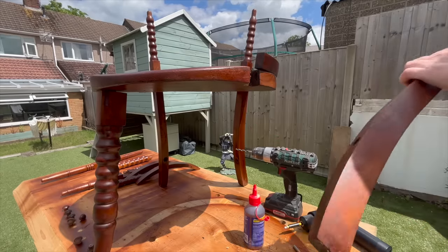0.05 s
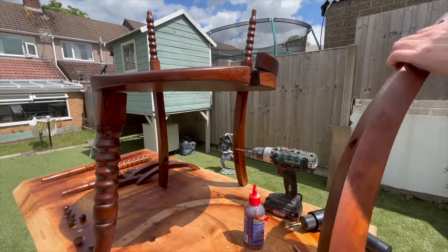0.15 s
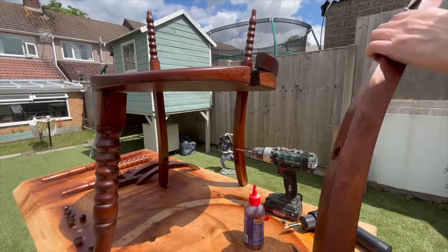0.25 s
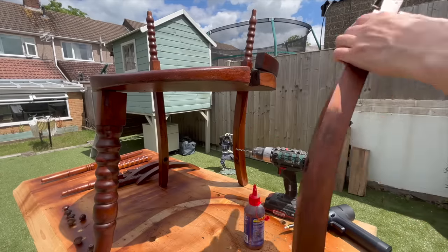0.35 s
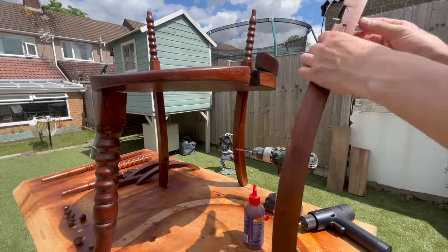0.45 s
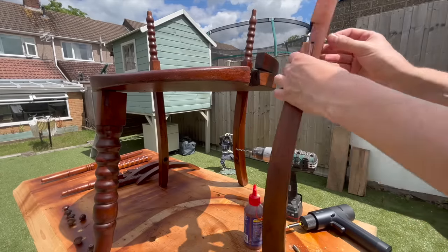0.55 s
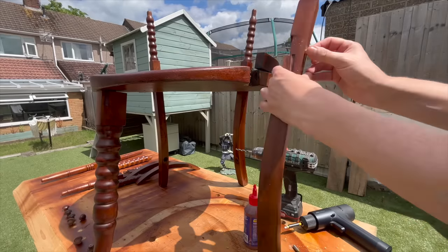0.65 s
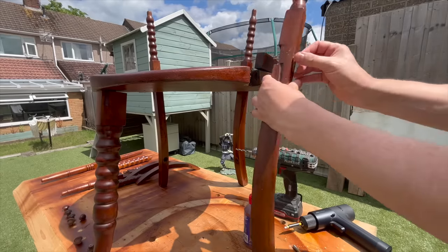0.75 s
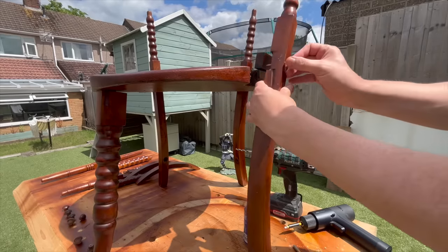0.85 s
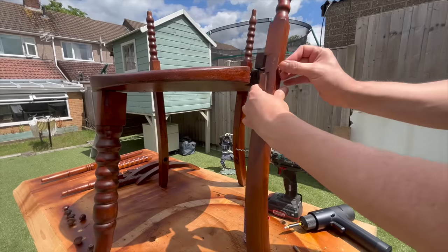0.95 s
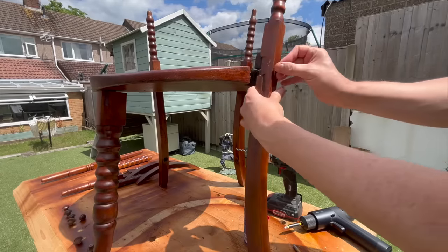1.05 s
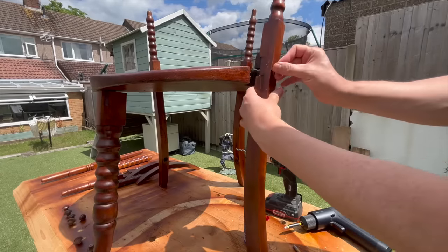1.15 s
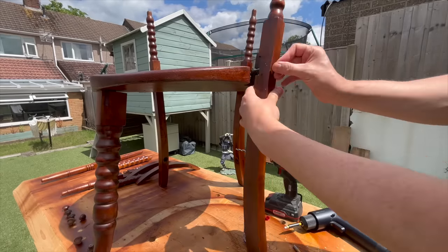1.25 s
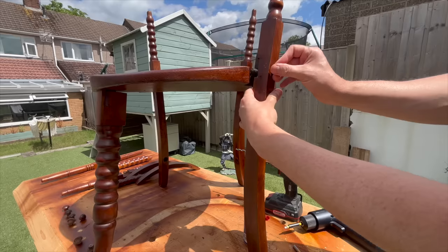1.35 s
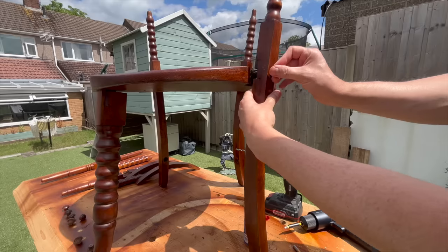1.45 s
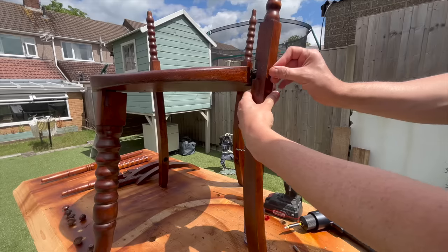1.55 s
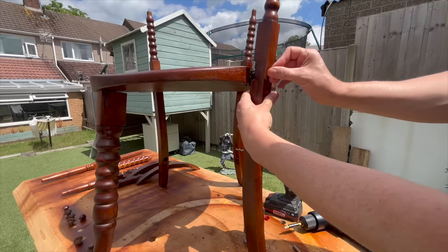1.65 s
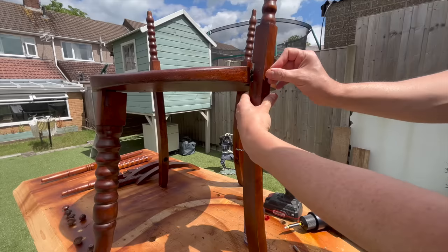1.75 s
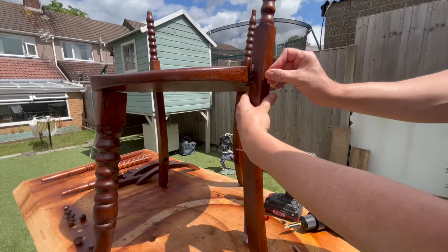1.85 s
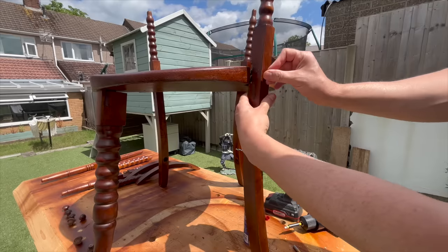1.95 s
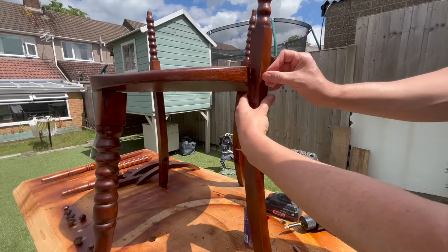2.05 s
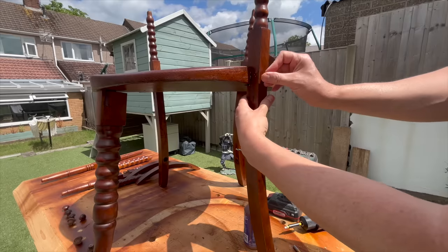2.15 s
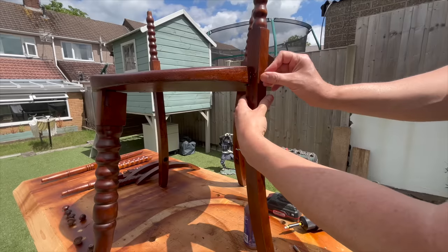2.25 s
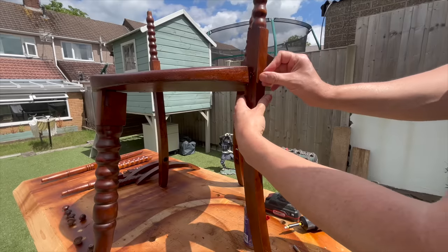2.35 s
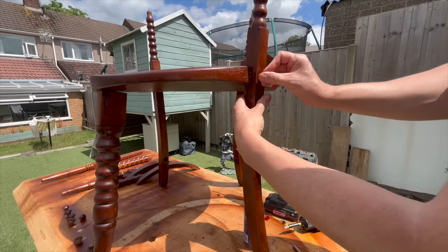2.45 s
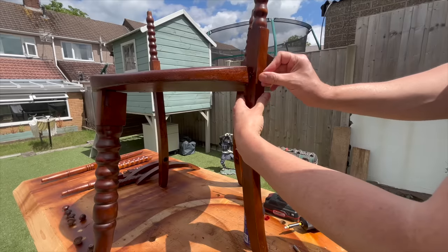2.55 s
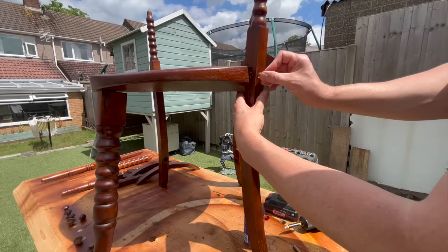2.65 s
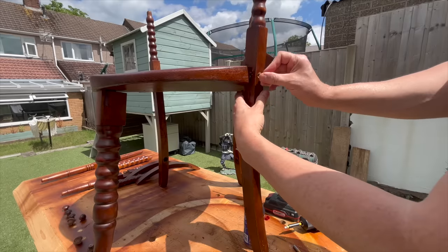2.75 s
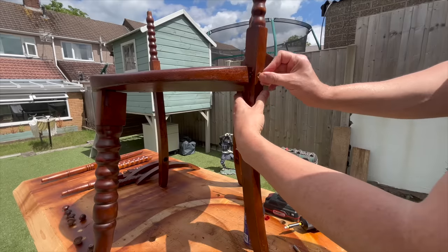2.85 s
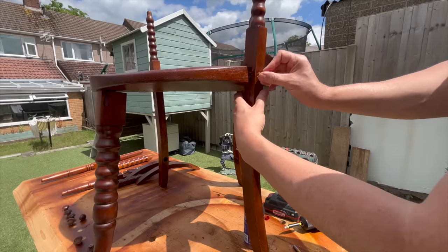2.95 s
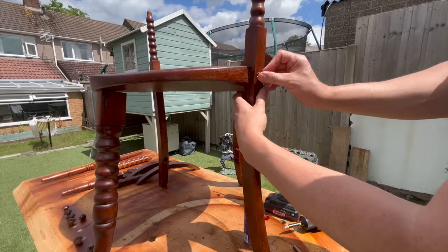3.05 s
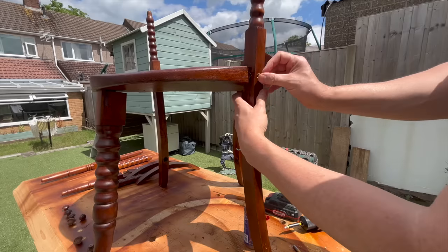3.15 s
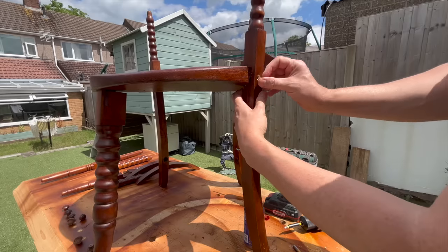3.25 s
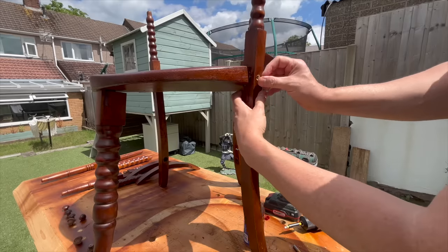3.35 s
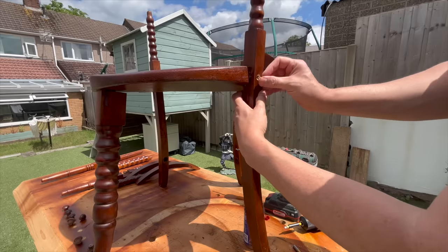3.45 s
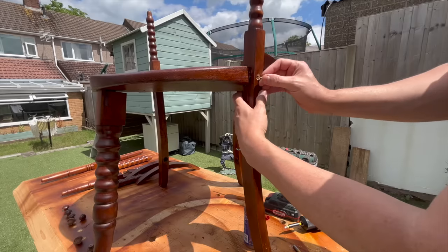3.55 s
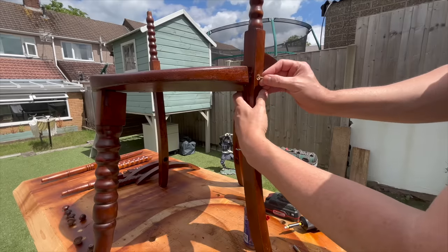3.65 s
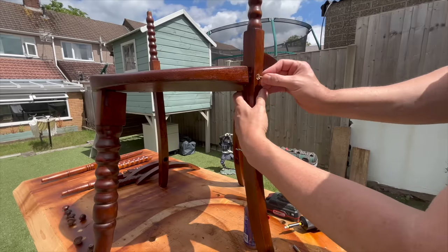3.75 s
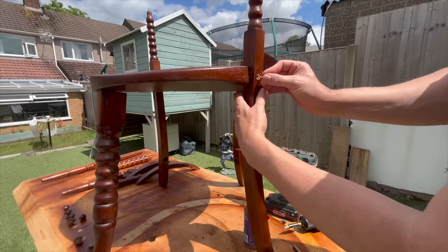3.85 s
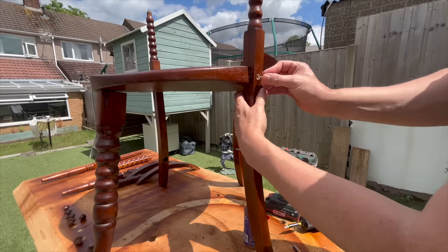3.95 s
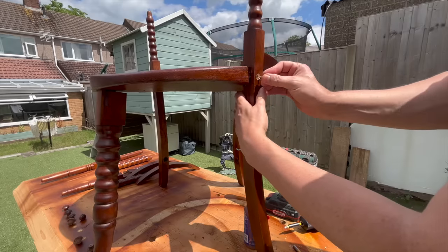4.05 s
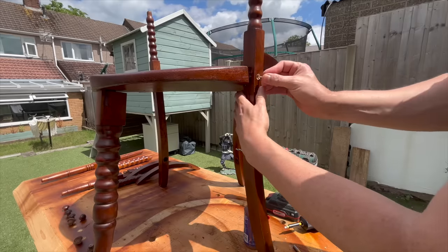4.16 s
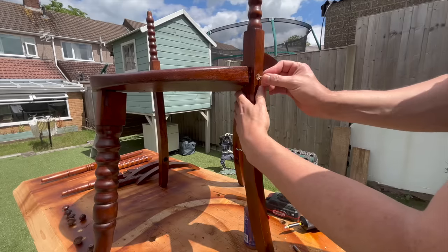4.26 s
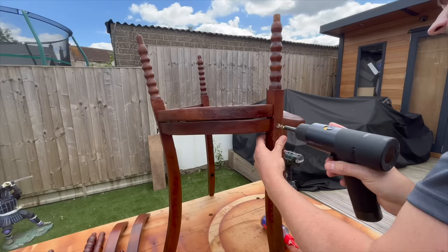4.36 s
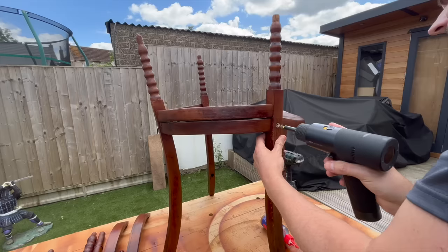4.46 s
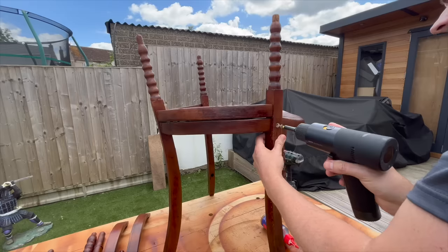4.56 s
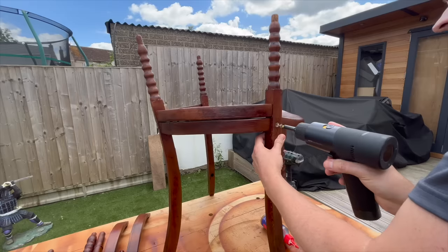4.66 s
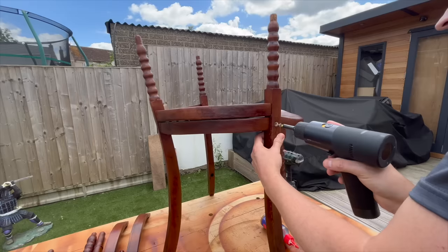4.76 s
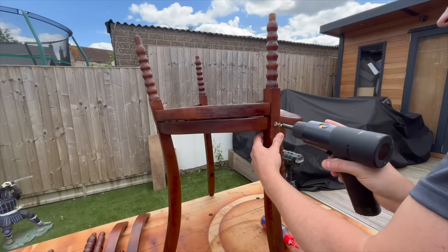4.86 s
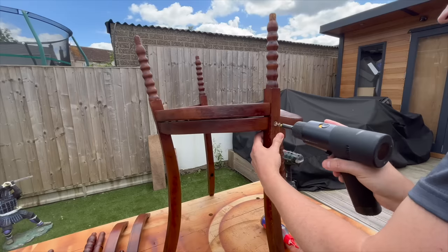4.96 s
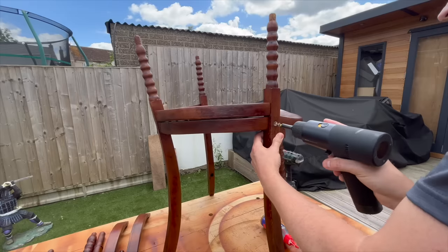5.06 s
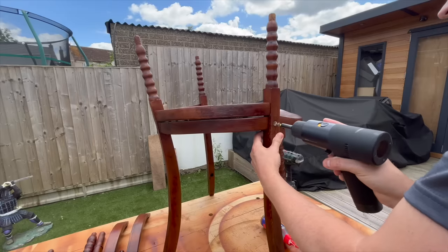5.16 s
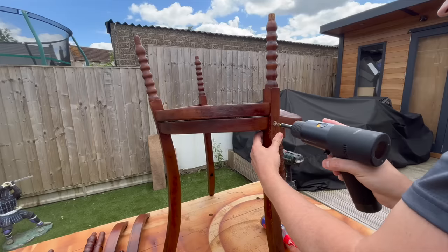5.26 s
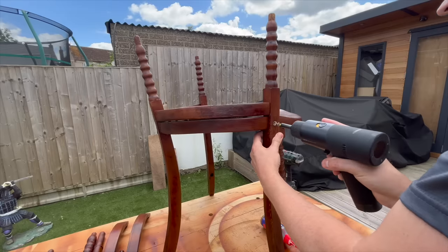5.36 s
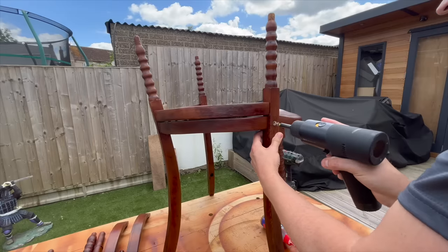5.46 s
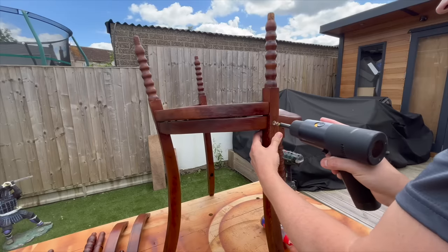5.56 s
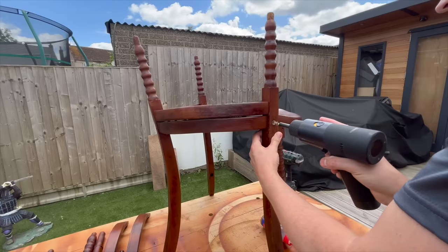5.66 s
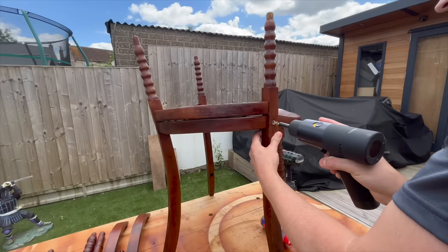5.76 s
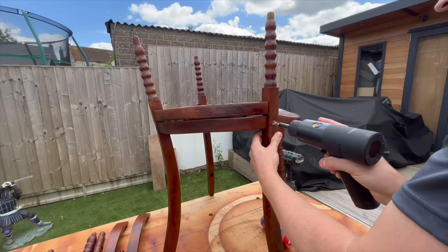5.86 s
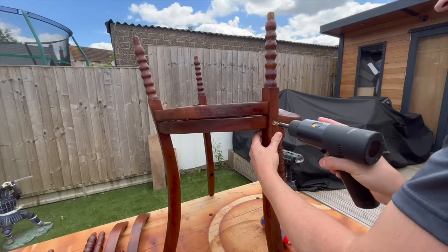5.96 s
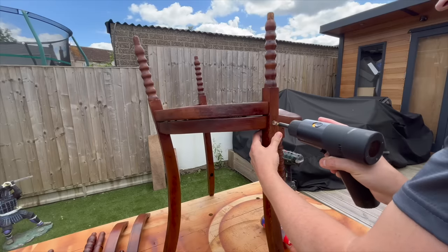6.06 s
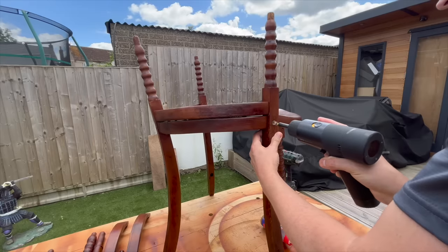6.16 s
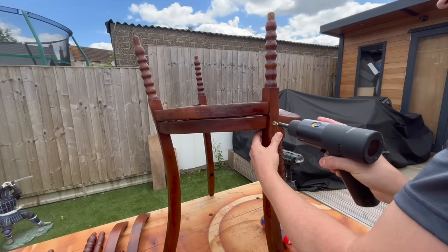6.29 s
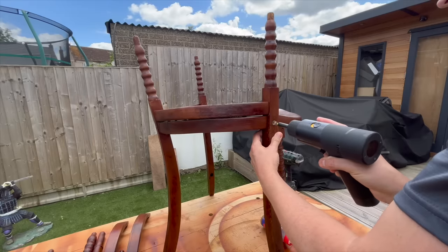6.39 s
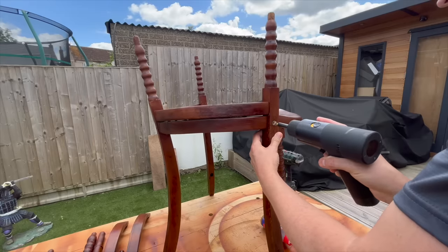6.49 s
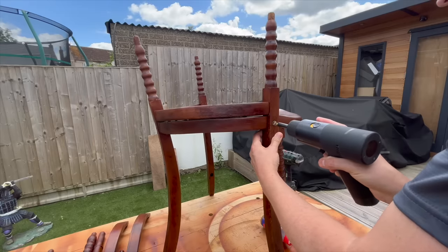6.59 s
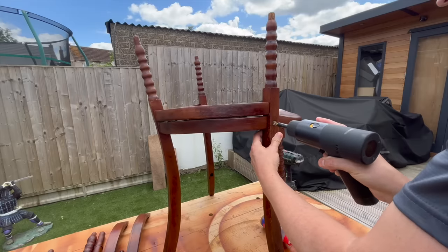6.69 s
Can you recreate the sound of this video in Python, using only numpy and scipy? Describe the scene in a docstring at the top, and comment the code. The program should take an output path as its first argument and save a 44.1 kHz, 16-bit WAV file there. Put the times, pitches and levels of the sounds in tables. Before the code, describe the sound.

In a quiet garden, small metal parts tick and a wooden chair leg is fitted with a few light, dull knocks. Very faint birds trill high up over a soft hush of distant traffic and leaves. After a lull, a trigger clicks and a small cordless screwdriver starts close by. Its raspy motor whine is the loudest sound, climbing steadily in pitch and growing stronger to the end.

```python
"""A small cordless screwdriver starts and speeds up: its motor and gears whine at multiples of the
turn rate over a rasp of tooth contacts, coloured by the resonances of its plastic housing and a chair.
Before it starts, the wooden chair leg is fitted with a few light knocks and small metal parts tick,
each ringing in its damped modes. Around them is a garden: small birds trill nearby and far off
in frequency-modulated whistles, over distant traffic, leaves and wind."""
import sys
import numpy as np
from scipy import signal
from scipy.fft import rfft, irfft
from scipy.io import wavfile
from scipy.ndimage import uniform_filter1d

SR = 44100
rng = np.random.default_rng(int(sys.argv[2]) if len(sys.argv) > 2 else 0)


def generate_wav(sig):
    """Save sig (samples, or channels by samples) to the path in sys.argv[1] as 16-bit PCM at SR."""
    pcm = np.round(np.clip(np.atleast_2d(sig).T, -1, 1) * 32767).astype(np.int16)
    wavfile.write(sys.argv[1], SR, pcm)


N = 296616
T = np.arange(N) / SR
HZ = np.maximum(np.arange(N // 2 + 1) * SR / N, 1)


def amp(db):
    """Decibels to amplitude ratio."""
    return 10 ** (np.asarray(db) / 20)


def rms_one(x):
    """Normalisation to unit rms."""
    return x / np.sqrt(np.mean(x ** 2) + 1e-20)


def columns(rows, at, log=False):
    """Interpolation of a table along its first column, on a linear or logarithmic axis."""
    key, *rest = np.transpose(rows)
    return [np.interp(np.log(at), np.log(key), c) if log else np.interp(at, key, c) for c in rest]


def drift(rate):
    """Slow random modulation: straight lines between `rate` Gaussian values per second."""
    knots = rng.standard_normal(int(N / SR * 60) + 2)
    return np.interp(T * rate, np.arange(len(knots)), knots)


def pan(x, db):
    """Stereo placement by level difference, left minus right."""
    return x * amp([[db / 2], [-db / 2]])


def add(out, at_s, piece):
    """Superposition of a stereo piece from a given time."""
    i = round(at_s * SR)
    out[:, i:i + piece.shape[1]] += piece[:, :N - i]


# Hiss of traffic and leaves. Each row: time in seconds, level in dB.
AIR_LEVEL = [(0.0, -70.5), (0.15, -71), (0.45, -73), (4.8, -73.5)]
# Its spectrum. Each row: frequency in Hz, relative spectral density in dB.
AIR_SPECTRUM = [(35, -43), (60, -6.5), (110, -4.5), (250, -6), (500, -8), (1000, -12.5), (1600, -13),
                (2050, -16), (2500, -25), (4000, -27.5), (7000, -29.5), (10000, -30), (15000, -33)]
def traffic_and_leaves():
    """Many distant sources sum to broadband noise, only partly coherent between left and right."""
    coherence = 0.13
    common, left, right = rng.standard_normal((3, N))
    white = np.sqrt(coherence) * common + np.sqrt(1 - coherence) * np.array([left, right])
    colour = amp(columns(AIR_SPECTRUM, HZ, log=True)[0])
    colour /= np.sqrt(np.mean(colour ** 2 * (HZ > 400) * (HZ < 2200)))
    return amp(columns(AIR_LEVEL, T)[0] + 0.24 * drift(11)) * irfft(rfft(white) * colour, N)


def wind():
    """Turbulence gives a low band of noise whose level wanders."""
    band = signal.butter(2, [9.517, 36.04], "band", fs=SR, output="sos")
    noise = rng.standard_normal((2, N)) + 0.78 * rng.standard_normal(N)
    return amp(-63 + 2 * drift(4.4)) * rms_one(signal.sosfilt(band, noise))


def struck(modes, centre_hz, octaves, t60_scale, rise_cycles):
    """Modal response to a blow: damped sines, favoured near centre_hz; low modes build up later."""
    t, out = T[:SR // 2], 0
    for k, (hz, db, t60) in enumerate(modes):
        excitation = (-1) ** k * amp(db - 5.95 * (np.log2(hz / centre_hz) / octaves) ** 2)
        envelope = amp(-60 * t / (t60 * t60_scale)) * (1 - np.exp(-t * hz / rise_cycles))
        out = out + excitation * envelope * np.sin(2 * np.pi * hz * t)
    return out


# Modes of screw and fitting. Each row: frequency in Hz, relative level in dB, unscaled T60 in seconds.
METAL_MODES = [(3530, -22, 0.0174), (3960, -2.5, 0.071), (4210, -10, 0.072), (4820, 3.5, 0.0093),
               (5000, 0.5, 0.027), (5340, -1.5, 0.028), (5870, -4, 0.023), (6430, 0.5, 0.012),
               (8040, 1, 0.0092), (9300, 3.5, 0.01), (10600, -2.5, 0.015), (11900, -3, .012)]
# Each row: start in seconds, gain in dB, best excited frequency in Hz, spread in octaves,
# relative rattle level in dB, rattle T60 in seconds.
METAL_TICKS = [(0.0, -59, 5560, 1.06, -4, 0.27), (0.357, -44.5, 4650, 0.12, -20.5, 0.11),
               (1.103, -54, 3560, 0.087, -30, .03), (3.714, -64, 10000, .2, -30, .02),
               (3.82, -72, 11000, .3, -30, .02)]
def metal_ticks():
    """Convolution: an impact and a dying rattle of small contacts each excite the metal's modes."""
    out, t = np.zeros((2, N)), T[:SR // 4]
    for start, db, hz, octaves, rattle_db, t60 in METAL_TICKS:
        contacts = rng.standard_normal((2, len(t))) * (rng.random(len(t)) < .15)
        contacts *= amp(rattle_db - 60 * t / t60)
        contacts[:, 0] = 1  # the first impact
        ring = struck(METAL_MODES, hz, octaves, t60_scale=0.4, rise_cycles=0.66)
        add(out, start, amp(db) * signal.fftconvolve(contacts, [ring], axes=1))
    return out


# Each row: start in seconds, length in seconds, centre in Hz, bandwidth in Hz, top level in dB.
HISS_SWELLS = [(0.018, 0.39, 1970, 290, -76), (0.099, 0.23, 1530, 200, -75.5), (2.516, 0.23, 1690, 73, -80),
               (3.901, .5, 1670, 230, -80.5), (4.397, 0.38, 997, 6.9, -81.5)]
def far_hiss():
    """Amplitude modulation: faint narrow bands of noise swell and fade under a half sine."""
    out = np.zeros((2, N))
    for start, length, hz, width, db in HISS_SWELLS:
        t = T[:round(length * SR)]
        band = signal.butter(2, [hz - width / 2, hz + width / 2], "band", fs=SR, output="sos")
        hiss = signal.sosfilt(band, rng.standard_normal((2, SR)) + rng.standard_normal(SR))
        add(out, start, amp(db) * np.sin(np.pi * t / length) * rms_one(hiss[:, -len(t):]))
    return out


# Each row: start in seconds, length in seconds, first and last centre pitch in Hz, warble depth in Hz,
# warbles per second, echo level in dB, 0 for near or 1 for far.
TRILLS = [(.03, .03, 8250, 8200, 50, 30, -68, 0), (.06, .09, 8600, 8740, 443, 36, -66, 0),
          (.191, .108, 8830, 8600, 506, 33, -65, 0), (.394, .121, 8840, 8660, 550, 36, -67, 0),
          (.612, .112, 8300, 8600, 450, 37, -69, 0), (.829, .213, 8700, 8800, 503, 62, -69.5, 0),
          (.977, .125, 7750, 7700, 200, 51, -74, 1), (1.37, .04, 8200, 7700, 150, 30, -82, 1),
          (1.4, .2, 7780, 7920, 500, 34, -76, 1), (1.62, .142, 8300, 8080, 505, 46, -75, 1),
          (1.77, .21, 7900, 8350, 550, 55, -74, 1), (2.03, .22, 8150, 8050, 650, 38, -74, 1),
          (2.405, .143, 7430, 7900, 150, 20, -77, 1), (2.56, .16, 4570, 4490, 40, 17, -85, 1),
          (2.58, .142, 7900, 7800, 200, 37, -80, 1), (2.92, .1, 7500, 7850, 151, 43, -80, 1),
          (3.08, .12, 7900, 7900, 200, 66, -80, 1), (3.151, .053, 4780, 4600, 398, 60, -79, 1),
          (3.256, .054, 5350, 5250, 280, 50, -83, 1), (3.31, .209, 7630, 8000, 346, 49, -76, 1),
          (3.66, .177, 7470, 7900, 150, 42, -79.5, 1), (3.858, .122, 7940, 8100, 350, 36, -82, 1),
          (4.277, .193, 8100, 8100, 400, 40, -75, 1), (4.664, .15, 7570, 8120, 300, 40, -74, 1)]
def birds():
    """Frequency modulation makes each whistle a trill; fences and walls return a diffuse echo."""
    out, tail, garden_t60_s = np.zeros((2, N)), T[:SR // 3], 0.49
    for start, length, hz0, hz1, depth_hz, rate, echo_db, far in TRILLS:
        direct_db, softness, unevenness = (-3.5, .6, .35) if far else (.5, .2, 0)
        t = T[:round(length * SR)]
        warbles = rate * t + unevenness * drift(60)[:len(t)]
        height = 1 - np.abs(np.sin(np.pi * warbles))  # pointed tops
        pitch = hz0 + (hz1 - hz0) * t / t[-1] + depth_hz * (2 * height - 1)
        envelope = np.abs(np.sin(np.pi * t / t[-1])) ** softness
        envelope *= amp(-5 * (height - .5))  # the tops are fainter
        note = envelope * np.sin(2 * np.pi * np.cumsum(pitch) / SR)
        garden = rng.standard_normal((2, len(tail))) * amp(-60 * tail / garden_t60_s)
        echo = signal.fftconvolve([note], garden / np.sqrt(np.sum(garden ** 2) / 2), axes=1)
        add(out, start, pan(amp(echo_db + direct_db) * note, 0))
        add(out, start, amp(echo_db) * echo)
    return out


# Each row: frequency in Hz, relative level in dB, unscaled T60 in seconds.
CHAIR_MODES = [(112, 4, 0.15), (179, 17, 0.18), (278.6, -10.5, 0.26), (341.4, 6.5, 0.098), (477, -6, 0.13),
               (562, -1.5, 0.11), (620, 11, 0.023), (802, 8, 0.032), (1016, 12, 0.023), (1244, -13, 0.12),
               (1420, 0, 0.045)]
# Each row: start in seconds, gain in dB, best excited frequency in Hz, spread in octaves,
# factor on T60, left minus right in dB.
CHAIR_KNOCKS = [(1.048, -40.5, 506, 0.93, 0.86, -8.5), (1.07, -40.5, 298, 1.18, 0.82, 2.5),
                (1.638, -33, 109, 0.33, 0.16, 23), (1.797, -35, 379, 0.51, 0.7, -9),
                (1.831, -37, 295, 0.73, 0.16, 5), (2.43, -52, 99, 0.41, 0.66, 12),
                (2.685, -47.5, 280, 0.54, 0.34, -4)]
def chair_knocks():
    """Free vibration of struck wood, with early reflections from the table and fences."""
    out, t = np.zeros((2, N)), T[:SR // 4]
    echo_db, echo_t60_s = 1, 0.097
    for start, db, hz, octaves, t60_scale, side_db in CHAIR_KNOCKS:
        knock = pan(amp(db) * struck(CHAIR_MODES, hz, octaves, t60_scale, rise_cycles=3.45), side_db)
        reflections = rng.standard_normal((1, len(t))) * amp(-60 * t / echo_t60_s)
        reflections /= np.sqrt(np.sum(reflections ** 2))
        add(out, start, knock)
        add(out, start, amp(echo_db) * signal.fftconvolve(knock, reflections, axes=1))
    return out


# Each row: start in seconds, level in dB.
TRIGGER_BOUNCES = [(4.812, -48), (4.8165, -49), (4.82, -48), (4.827, -40), (4.833, -37)]
def trigger():
    """Contact bounce: the trigger chatters shut, ringing one short mode at each touch."""
    out, hz, t60_s = np.zeros((2, N)), 2950, .01368
    click = struck([(hz, 0, t60_s)], hz, octaves=1, t60_scale=1, rise_cycles=1.7)
    for start, db in TRIGGER_BOUNCES:
        add(out, start, pan(amp(db) * click, 0))
    return out


def speed_gain_db(speed, knee, db_per_octave):
    """Broken power law: the given slope up to the knee speed, then a fall of 30 dB per octave."""
    octaves = np.log2(speed / knee)
    return np.where(octaves < 0, db_per_octave, -30) * octaves


def resonances(peaks):
    """Frequency response of overlapping resonances, summed in power."""
    return np.sqrt(sum(amp(2 * db) / (1 + (2 * (HZ - hz) / width) ** 4) for hz, width, db in peaks))


# Motor and gear tones, as multiples of the turn rate.
ORDERS = [.296, 1, 2, 3, 4, 5.09, 6, 8, 10, 13, 14, 15, 16, 20, 22, 26, 28]
# One row per order: relative level at the knee in dB, knee speed in turns per second,
# slope below the knee in dB per octave.
ORDER_LEVELS = [(-16, 433, 5), (-28, 480, 2), (-10, 403, 17), (-16.5, 250, 8), (-26, 480, -2),
                (-8.5, 397, 7), (-10, 327, -7), (-9.5, 400, 16), (-11, 313, 13), (-4, 590, 21),
                (-10.5, 214, 14), (-4, 440, 14), (-13, 197, 14), (-7, 120, 13), (-13, 140, 12),
                (-11, 118, 15), (-20, 105, 15)]
def gear_whine(speed, turns, octaves):
    """Rotational orders: tones locked to the shaft, each wavering in level and phase."""
    whine = 0
    for order, (db, knee, slope) in zip(ORDERS, ORDER_LEVELS):
        level = amp(db + speed_gain_db(speed, knee, slope) + 2.8 * drift(25))
        whine += level * np.sin(2 * np.pi * (order * turns + .045 * drift(33)))
    return whine * amp(3 - 2.4 * octaves ** 2)  # sags away from mid speed


# Resonances of housing and chair. Each row: centre in Hz, bandwidth in Hz, relative level in dB.
BODY_RESONANCES = [(132, 81, -20.5), (285, 142, -16), (429, 153, -10.5), (648, 98, -10), (786, 200, -12),
                   (1070, 295, -8), (1376, 310, -3.5), (1984, 250, 1.5), (2410, 316, 0.5),
                   (2930, 390, -2.5), (3320, 44, -1), (3730, 720, -7), (4515, 450, -7), (5130, 670, -9),
                   (6680, 1260, -10.5), (8470, 1230, -13.5), (9720, 960, -8), (10900, 500, -17),
                   (13460, 7800, -13)]
def gear_rasp(octaves):
    """Source and filter: tooth contacts drive the body with noise bursts, in three separate streams."""
    bursts = amp(5.1 * uniform_filter1d(rng.standard_normal(N), size=64) + drift(22))
    contacts = rms_one(bursts * rng.standard_normal((3, N)))
    rumble = signal.sosfilt(signal.butter(2, 500, fs=SR, output="sos"), contacts)
    contacts += amp(-17 + 5.1 * octaves) * rumble  # the chair rumbles more as the speed rises
    spectra = rfft(contacts) * rms_one(resonances(BODY_RESONANCES))
    highpass = 1 / np.sqrt(1 + (4980 / HZ) ** 8)
    lows = irfft(spectra * np.sqrt(1 - highpass ** 2), N)
    treble = irfft(spectra * highpass, N)
    return lows + amp(-1.63 + 2.5 * octaves) * treble


# Each row: offset above the chopping rate in multiples of the turn rate, relative level in dB.
CHOPPER_TONES = [(0, -25), (2, -19.5), (4, -28)]
def chopper_whistle(speed, turns):
    """The speed control chops the current: a carrier tone with sidebands that climb with the speed."""
    chop_hz = 9980
    whistle = sum(amp(db) * np.sin(2 * np.pi * (chop_hz * T + k * turns)) for k, db in CHOPPER_TONES)
    return amp(speed_gain_db(speed, knee=270, db_per_octave=-1.5)) * whistle


# How two microphone ports hear the tool. Each row: frequency in Hz, rasp coherence from 0 to 1,
# phase lag of the left in radians, left minus right in dB.
PORT_RESPONSE = [(130, 0.72, -0.19, 1.5), (320, 1, 0.73, -2), (694, 0, 1.2, -13), (1310, 0.2, 0.79, 1.5),
                 (2400, 1, 0.83, 0), (3000, 0.02, 0.21, 3), (5640, 0.36, 1.7, -2), (6955, 1, 1.67, -4.5),
                 (8400, 0.92, -1.5, -8), (10500, 0, -0.53, -5.5), (11100, 0.99, 0, 0), (14100, 0.97, 0, 0)]
def at_ports(rasp, whine_spectrum):
    """Two spaced receivers differ in phase and level; the rasp is only partly coherent between them."""
    coherence, lag, side_db = columns(PORT_RESPONSE, HZ, log=True)
    coherence = np.clip(coherence, 0, 1)
    common, left, right = rfft(rasp)
    shared = (np.sqrt(coherence) * common + whine_spectrum) * np.exp(.5j * lag * [[-1], [1]])
    separate = np.sqrt(1 - coherence) * np.array([left, right])
    return irfft(amp(side_db * [[.5], [-.5]]) * (shared + separate), N)


# Each row: time in seconds, motor speed in turns per second.
MOTOR_SPEED = [(4.82, 74), (4.86, 80), (5.0, 118), (5.4, 219.5), (5.6, 267), (6.2, 401.5), (6.4, 452),
               (6.73, 525)]
# Resonances that radiate the whine. Each row: centre in Hz, bandwidth in Hz, gain in dB.
WHINE_RESONANCES = [(114, 16, -6), (137, 10, -5), (390, 55, -12.5), (620, 170, -8), (770, 110, -6),
                    (960, 90, -8), (1080, 110, 0.5), (1250, 170, -1), (1460, 200, -5), (1910, 300, 0.5),
                    (2380, 170, 4), (2620, 300, -1), (2890, 190, 8), (3230, 300, -1.5), (3750, 500, -6),
                    (4600, 900, -12), (6550, 800, -14)]
def screwdriver():
    """Forced vibration: one motor speed governs the whine, the rasp and the whistle."""
    start_s, rise_s, mid_turns_per_s = 4.826, .012, 300
    speed, = columns(MOTOR_SPEED, T)
    turns = np.cumsum(speed) / SR
    octaves = np.log2(speed / mid_turns_per_s)
    rise = 1 - np.exp(-np.maximum(T - start_s, 0) / rise_s)  # the motor takes up the gear play
    level = rise * amp(-38.5 + 5.5 * octaves + .5 * drift(8))
    whine_spectrum = rfft(level * gear_whine(speed, turns, octaves)) * resonances(WHINE_RESONANCES)
    gears = at_ports(level * gear_rasp(octaves), whine_spectrum)
    return (T > start_s) * gears + level * chopper_whistle(speed, turns)


def scene():
    """Linear superposition: the pressures of all sources add."""
    return (traffic_and_leaves() + wind() + metal_ticks() + far_hiss() + birds()
            + chair_knocks() + trigger() + screwdriver())


def record(dry):
    """Band limiting: a steep low-pass removes the highest treble."""
    stop_db, stop_hz = 70, 15500
    return signal.sosfilt(signal.cheby2(14, stop_db, stop_hz, fs=SR, output="sos"), dry)


dry = scene()
out = record(dry)
generate_wav(out)
```